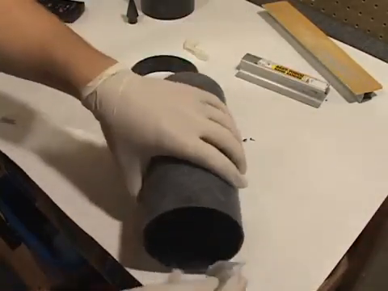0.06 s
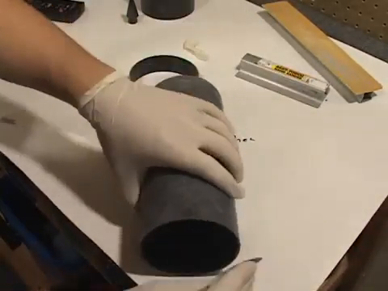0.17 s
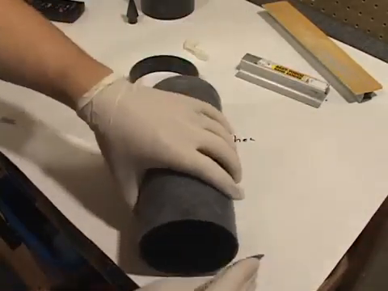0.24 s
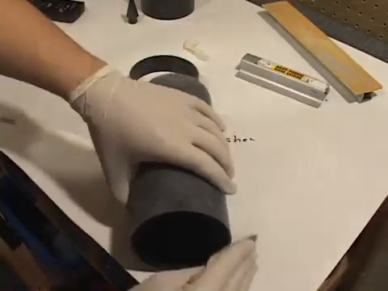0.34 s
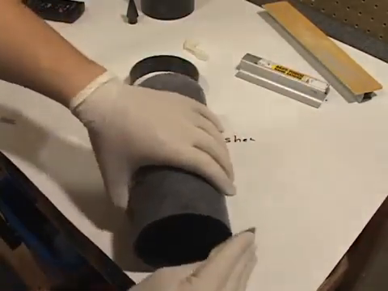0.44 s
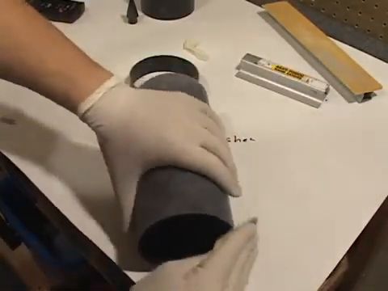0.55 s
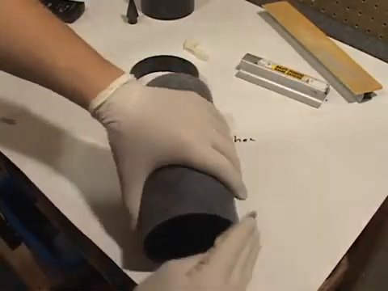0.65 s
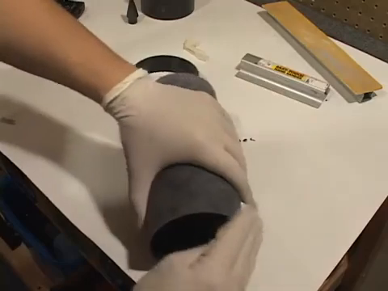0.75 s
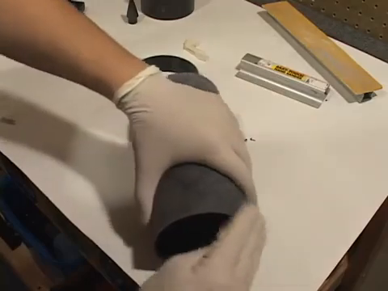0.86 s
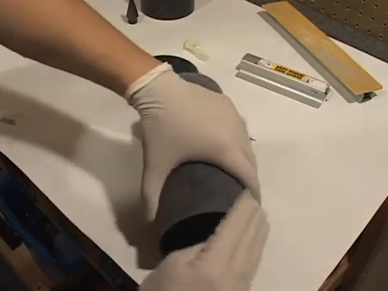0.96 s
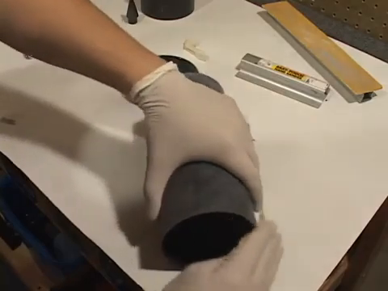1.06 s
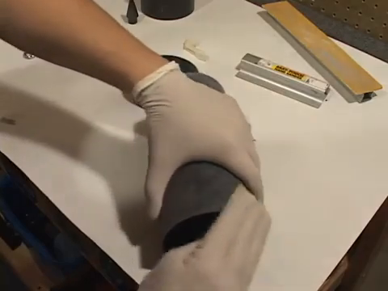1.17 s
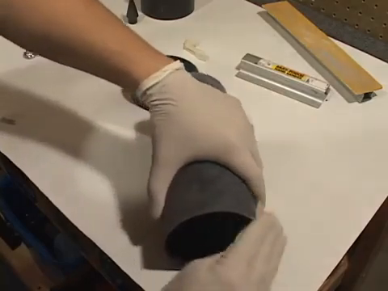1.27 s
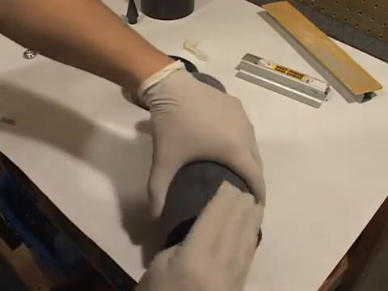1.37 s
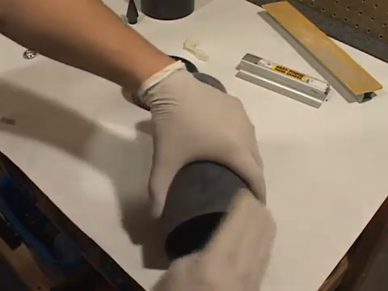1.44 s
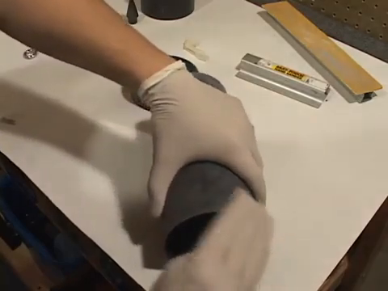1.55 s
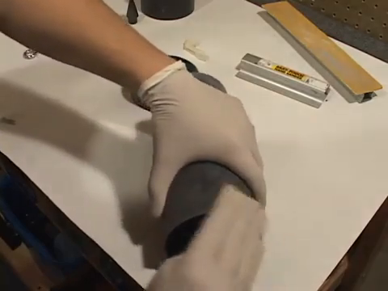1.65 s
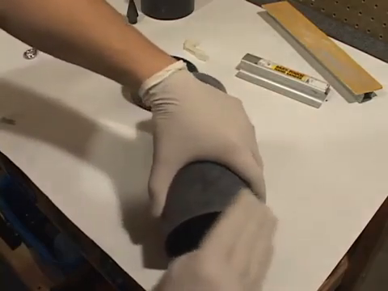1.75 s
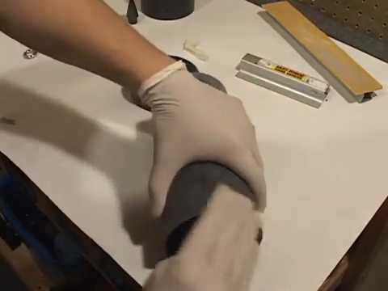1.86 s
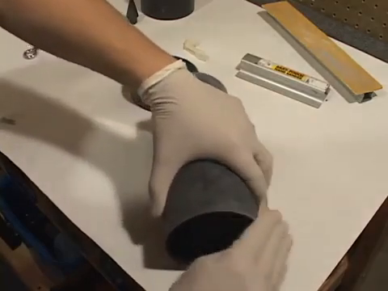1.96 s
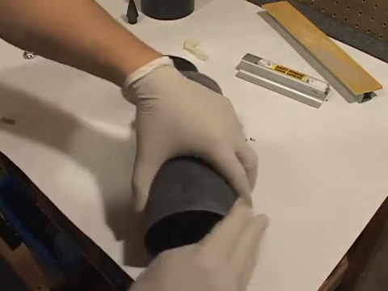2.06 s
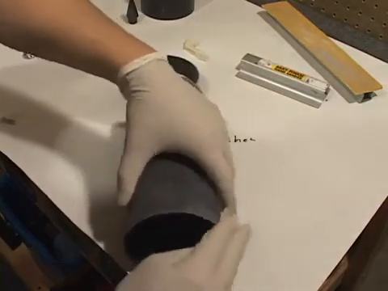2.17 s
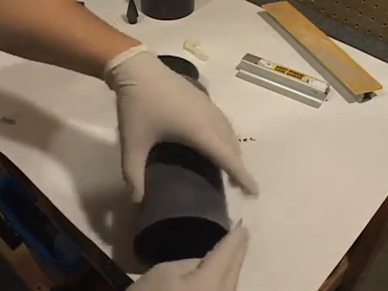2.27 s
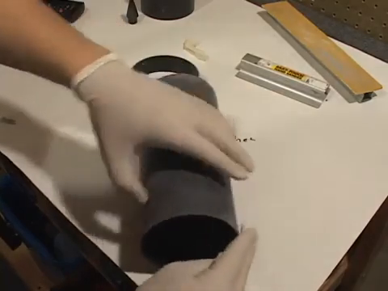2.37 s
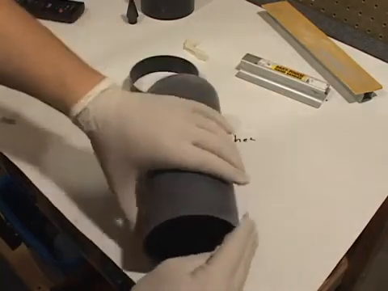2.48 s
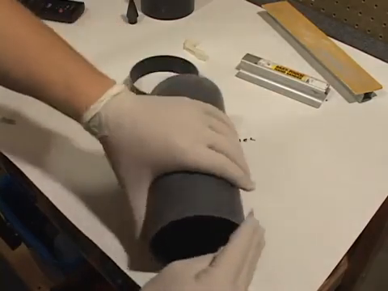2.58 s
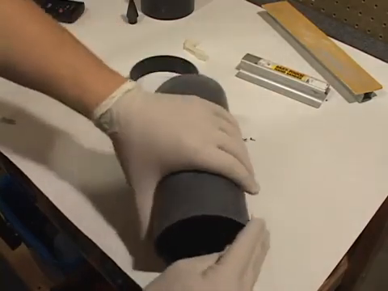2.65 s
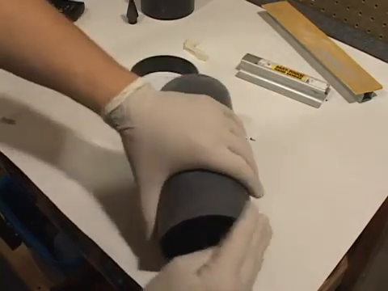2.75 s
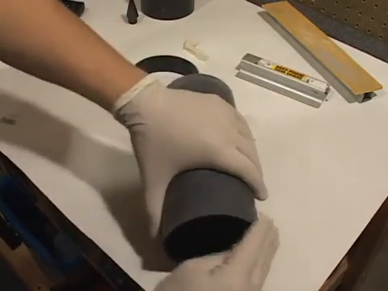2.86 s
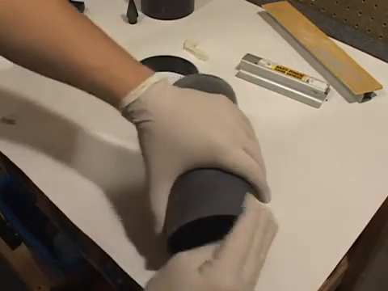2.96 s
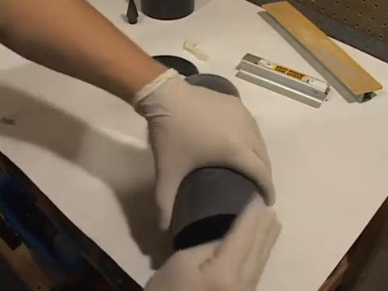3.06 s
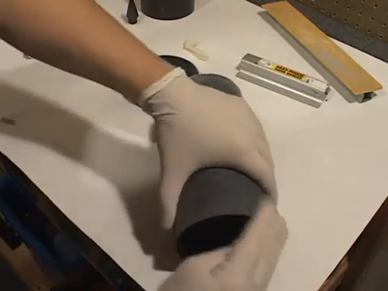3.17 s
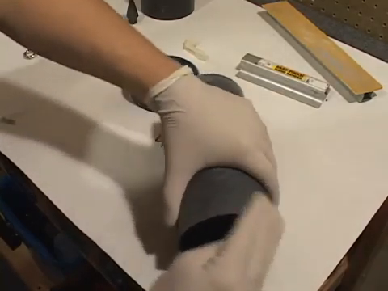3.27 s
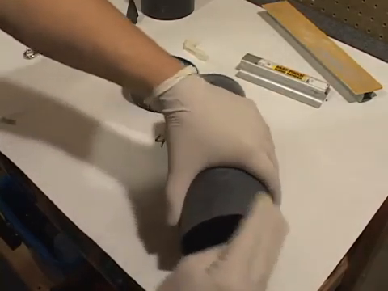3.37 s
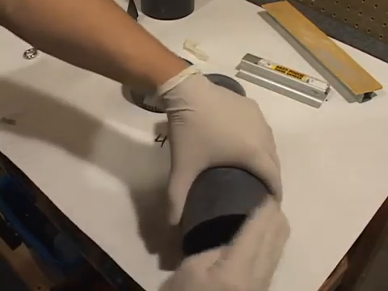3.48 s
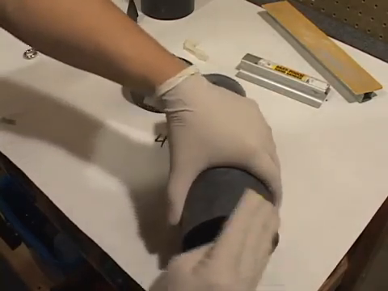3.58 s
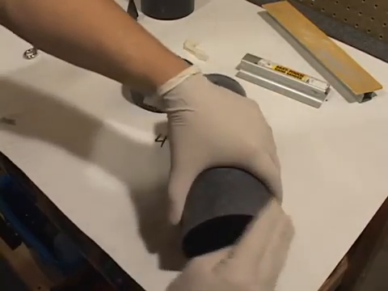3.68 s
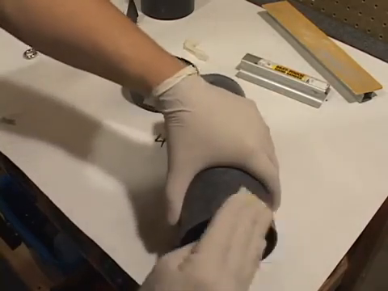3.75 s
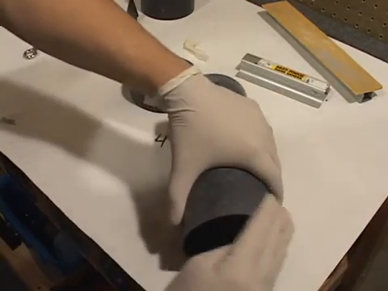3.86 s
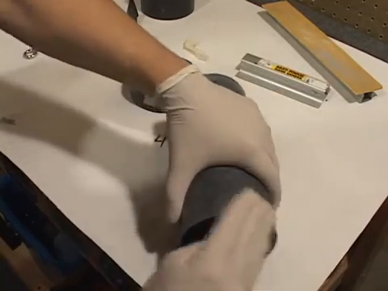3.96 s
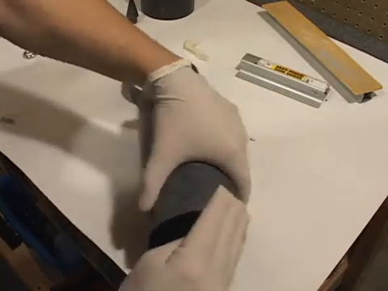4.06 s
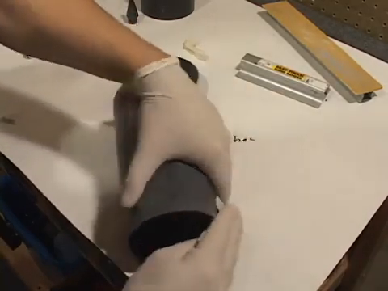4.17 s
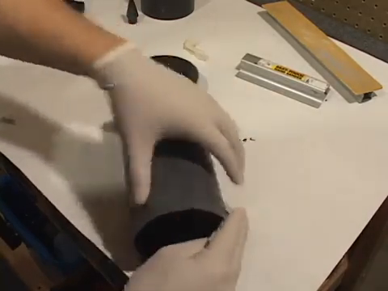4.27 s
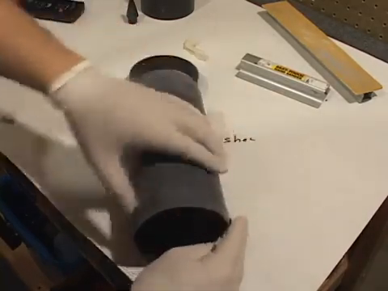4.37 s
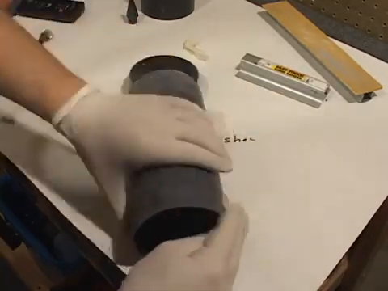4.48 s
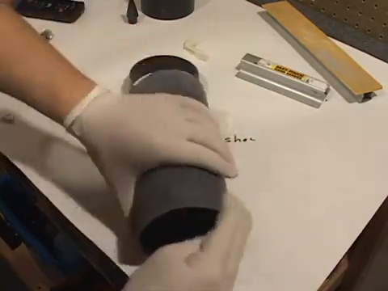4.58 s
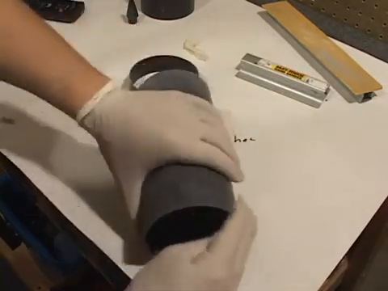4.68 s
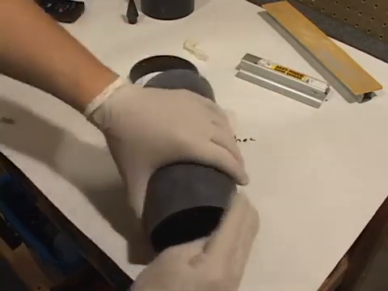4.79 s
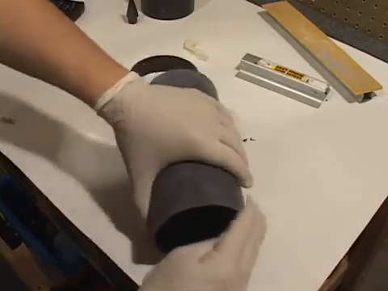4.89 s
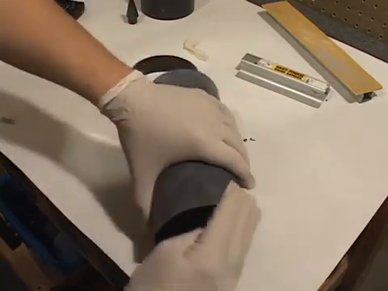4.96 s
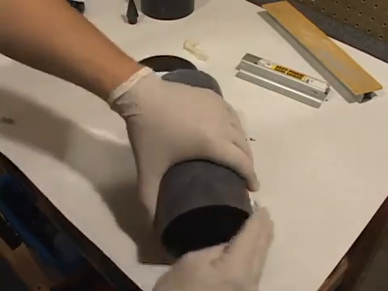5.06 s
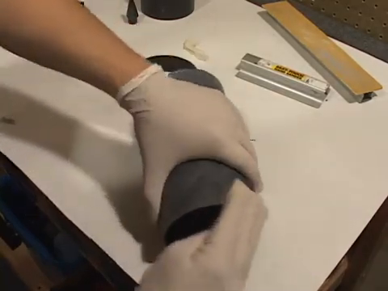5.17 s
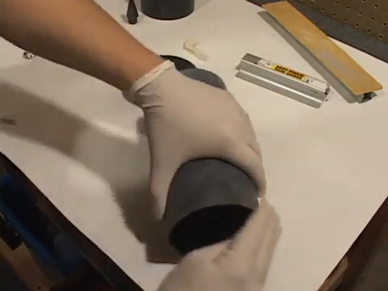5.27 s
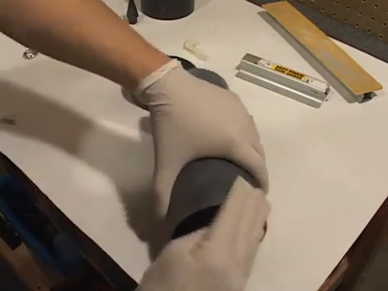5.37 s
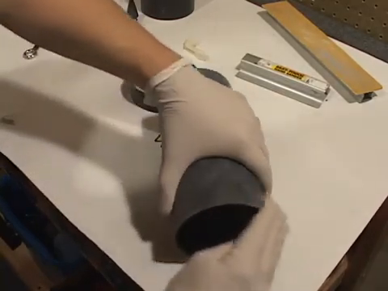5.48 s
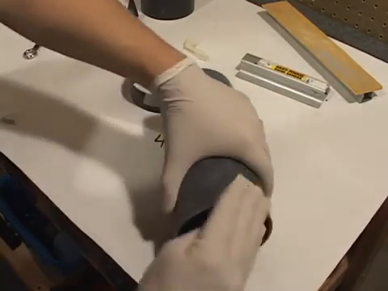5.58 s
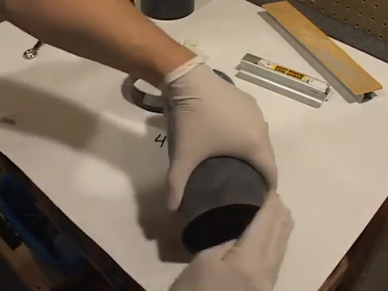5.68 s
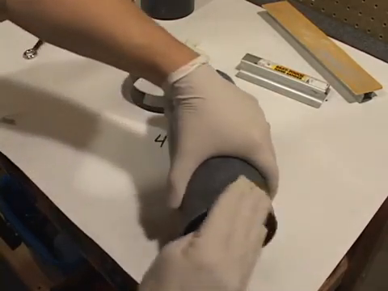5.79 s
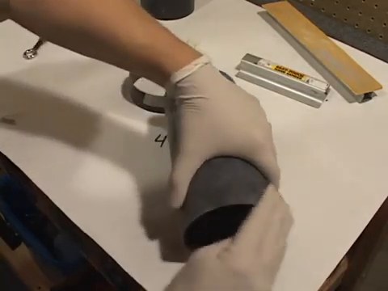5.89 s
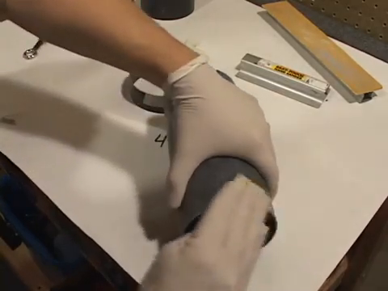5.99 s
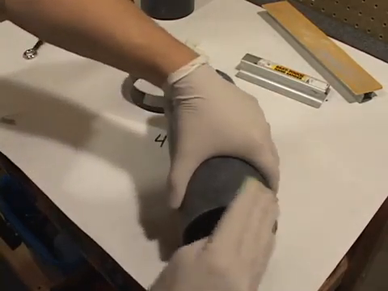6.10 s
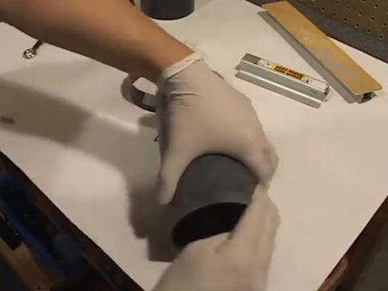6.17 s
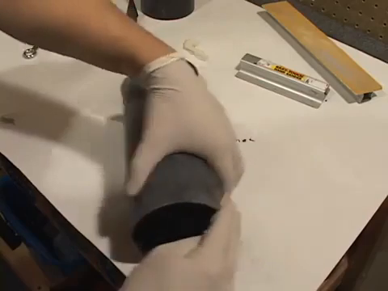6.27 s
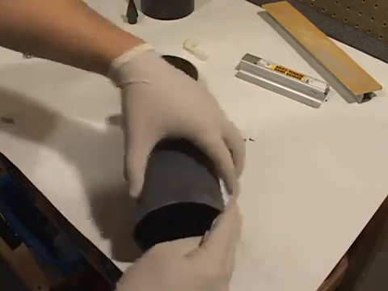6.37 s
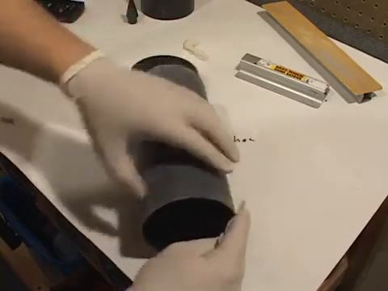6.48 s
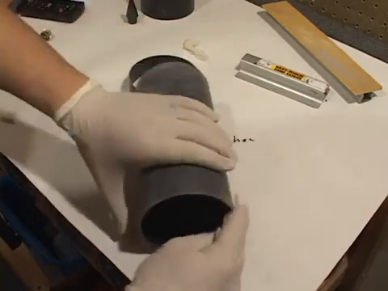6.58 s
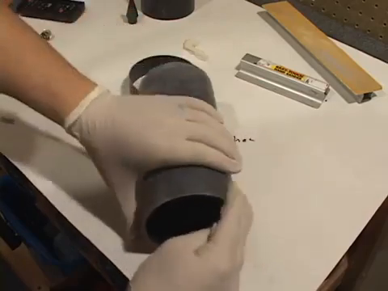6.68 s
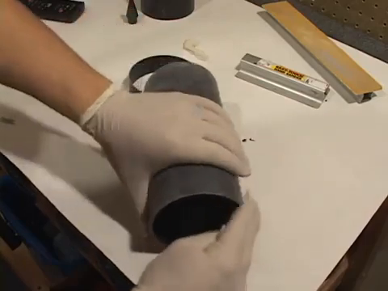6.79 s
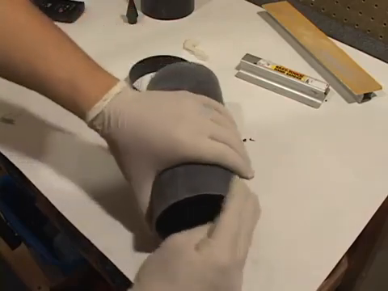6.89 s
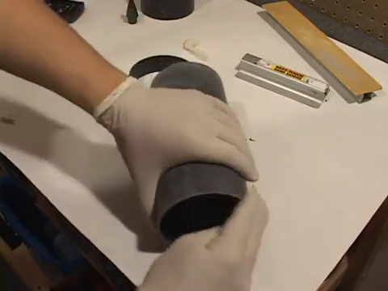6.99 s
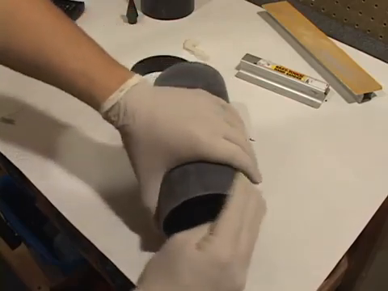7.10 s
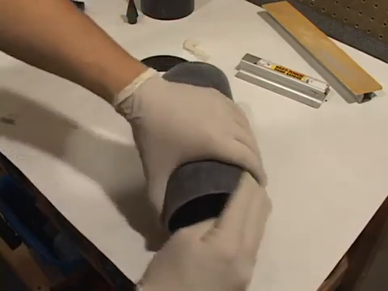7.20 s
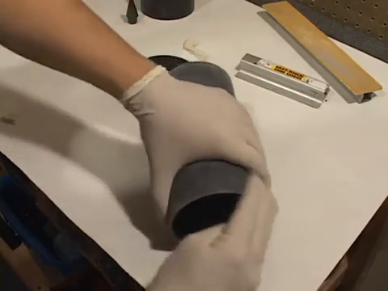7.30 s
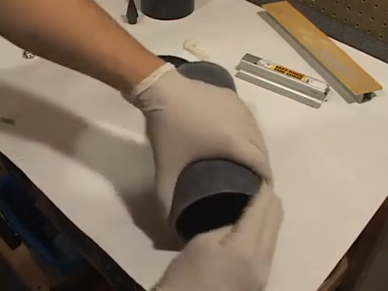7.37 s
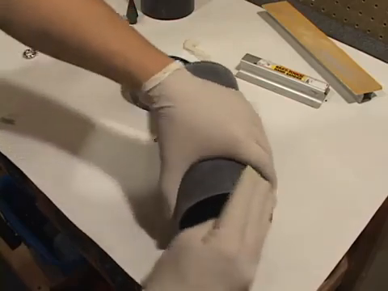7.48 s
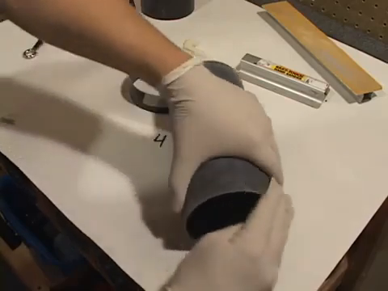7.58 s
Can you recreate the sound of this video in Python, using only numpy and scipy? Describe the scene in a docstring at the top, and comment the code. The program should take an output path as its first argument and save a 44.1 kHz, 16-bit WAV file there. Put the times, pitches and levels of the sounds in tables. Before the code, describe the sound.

A close stereo microphone in a small, fairly dry workshop hears sandpaper worked by hand inside a fiberglass tube. From 0 to 0.6 s there are light scrapes, low shuffles on the bench and small glove ticks, the sharpest near 0.2 s. Rapid back-and-forth strokes begin at 0.6 s, about ten a second, bright and gritty with tiny dips at each turn, growing stronger until 2.0 s. The tube is turned with a soft scrape and a thin squeak near 2.2 s, then a firm, hollow slap lands at 2.47 s. Sanding continues to 4.05 s; a stronger scrape follows, then a duller, quieter slap at 4.46 s. Another steady run lasts to 6.2 s, followed by a brighter scrape, a crisp tick and a hard ringing slap at 6.59 s. Strokes resume to the end around 7.6 s. Soft tube bumps, hollow humming, low rumble and faint room noise lie underneath.

```python
"""Sanding inside a fiberglass tube

Sandpaper scuffs back and forth inside the rim of a fiberglass tube on a workbench, heard close up.
Between runs of strokes the tube is turned, scraping on the bench, and the gloved hand slaps down on it again.
Rubbing is grainy noise shaped by the paper, wall and air column; slaps are fading tones with a crack and
a push of air, and light ticks are mostly crack. A small workshop answers; a faint room noise lies underneath."""
import sys
import numpy as np
from scipy import signal
from scipy.fft import rfft, irfft, next_fast_len
from scipy.io import wavfile
from scipy.ndimage import uniform_filter1d, map_coordinates

SR = 44100
rng = np.random.default_rng(int(sys.argv[2]) if len(sys.argv) > 2 else 0)


def store_wav(level_fs):
    """Save 16-bit WAV to argv[1]."""
    pcm = np.round(np.clip(np.atleast_2d(level_fs), -1, 1) * 32767)
    wavfile.write(sys.argv[1], SR, pcm.T.astype(np.int16))


N = 336919

# firm hand slaps, and two light ticks (0.592, 6.472) that are mostly crack:
# t/s, ring level/dB, softness above 2.2 kHz/(dB per octave), share of free ring time,
# then three levels relative to the ring: crack/dB, air push/dB, bore ring/dB
SLAPS = [(0.592, -43.5, -22, 1, 23, -36, -33), (2.4711, -5, -6.5, 0.42, -5, -13.5, -38),
         (4.456, -11.5, 22, 0.44, -6, -56, -34), (6.472, -39, -9, 0.22, 31.5, -36, -25),
         (6.5851, -4, -6, 0.42, -3, -17.5, -31.5)]
# low sounds of the work: t/s, bench rumble level/dB, level of the air inside the tube/dB (before it follows strokes)
LOWS = [(0.0, -72, -72), (0.25, -62, -48), (0.83, -56.5, -43.5), (1.34, -50.5, -38.5), (2.2, -64, -46),
        (2.49, -64, -50), (3.06, -51.5, -43.5), (4.2, -60, -46), (4.81, -53.5, -46), (5.85, -54, -43.5),
        (6.35, -60, -46), (6.79, -56, -49.5), (7.64, -59, -45)]


def amp(db):
    """Turn decibels into a plain factor."""
    return 10 ** (np.asarray(db) / 20)


def unit(x):
    """Scale a sound to rms 1."""
    return x / np.sqrt(np.mean(x ** 2) + 1e-20)


def along(points, hz):
    """Read a curve of (Hz, value) points on a log frequency axis."""
    f, v = np.transpose(points)
    return np.interp(np.log(hz + 1), np.log(f + 1), v)


def curves(rows, outside=None):
    """Give one value per sample for each column after the time."""
    s, *columns = np.transpose(rows)
    t = np.arange(N) / SR
    return [np.interp(t, s, column, outside, outside) for column in columns]


def wobble(rate):
    """A smooth random curve with rate knots a second."""
    knots = rng.standard_normal(int(N * rate / SR) + 4)
    return map_coordinates(knots, [np.arange(N) * rate / SR])


def filtered(x, response):
    """Multiply the spectrum of x by a complex response of frequency."""
    m = next_fast_len(N + SR // 2)
    return irfft(rfft(x, m) * response(np.fft.rfftfreq(m, 1 / SR)), m)[..., :N]


def coloured(x, spectrum):
    """Shape x by a (Hz, dB) spectrum, at rms 1."""
    return unit(filtered(x, lambda hz: amp(along(spectrum, hz))))


def above(x, edge_hz, order):
    """Keep the part of x above edge_hz, without shifting it in time."""
    return filtered(x, lambda hz: 1 / (1 + (edge_hz / (hz + 1)) ** order))


def resonant(x, modes):
    """Pass x through (Hz, width, dB) resonances over a weak broad response, at rms 1."""
    def response(f):
        peaks = 0
        for k, (hz, width, db) in enumerate(modes):
            peak = 1j * f * width / (hz * hz - f * f + 1j * f * width)
            peaks = peaks + (-1) ** k * amp(db) * peak  # neighbours alternate in sign
        lowest, highest = modes[0][0], modes[-1][0]
        broad = 0.27 / (1 + (lowest / (f + 1)) ** 4) / (1 + (f / highest / 3.84) ** 6)
        return peaks + broad
    return unit(filtered(x, response))


def grit(spiky_db, patchy_db):
    """Stereo friction noise: grains catch in short bursts, patches of pitch come and go, bands last about a stroke."""
    # how alike left and right are: f/Hz, correlation
    alike = [(30, 0.67), (200, 0.83), (700, 0.82), (1300, 0.8), (2400, 0.17), (4400, 0.14), (15000, 0.25)]
    grains = rng.standard_normal((2, N)) * amp(spiky_db * wobble(900))
    z = signal.stft(grains, nperseg=256)[2]

    def smooth_field(bins, frames):
        field = uniform_filter1d(rng.standard_normal(z.shape[1:]), size=bins, axis=0)
        return unit(uniform_filter1d(field, size=frames, axis=1))

    patches, bands = smooth_field(5, 8), smooth_field(2, 26)
    pair = signal.istft(z * amp(patchy_db * (patches + 1.1 * bands)), nperseg=256)[1][:, :N]

    def shares(hz):
        angle = np.arccos(np.clip(along(alike, hz), -1, 1)) / 2
        return np.array([np.cos(angle), np.sin(angle)])

    mid, side = filtered(pair, shares)
    return np.array([mid + side, mid - side])


def room_air():
    """Faint steady room noise: gently patchy noise with a fixed spectrum."""
    # room noise: f/Hz, density/(dB per Hz)
    spectrum = [(12, -29), (20, 15), (352, -7), (416, -9), (478, -5), (649, -28), (881, -2), (2920, 0),
                (13900, -18), (15500, -12)]
    return amp(-55) * coloured(grit(spiky_db=0, patchy_db=.8), spectrum)


def shop(x):
    """The workshop's answer: each frequency dies at its own speed, and the bass is weak."""
    # dying time of the room: f/Hz, time to fall 60 dB/s
    decay_times = [(200, 0.47), (2000, 0.22), (10000, 0.03)]
    hz, t, z = signal.stft(rng.standard_normal((2, SR // 2)), SR, nperseg=256)
    fading = z * amp(-60 * t / along(decay_times, hz)[:, None])
    tail = signal.istft(fading, SR, nperseg=256)[1]
    delayed = np.pad(x, ((0, 0), (150, 0)))  # 150 samples late
    wet = signal.fftconvolve(delayed, tail / np.linalg.norm(tail[0]), axes=1)[:, :N]
    return filtered(wet, lambda f: (1j * f / (700 + 1j * f)) ** 2)


def bench():
    """Lumpy low noise of hands and tube working on the bench, with a few heavier drags."""
    # forearm and tube drag on the bench: t/s, length/s, level/dB
    shuffles = [(.165, .11, -46), (.45, .11, -42)]
    # steady bench rumble: f/Hz, density/(dB per Hz)
    handling = [(15, -30), (30, -12), (60, -8), (150, 0), (213, -5), (400, -30)]
    # heavier drags: f/Hz, density/(dB per Hz)
    drag_spectrum = [(15, -24), (50, 9), (100, -6), (250, -9.5), (500, -33)]
    t = np.arange(N) / SR
    drags = np.zeros(N)
    for s, length, db in shuffles:
        start = 1 + np.tanh((t - s) / 0.0051)
        stop = 1 + np.tanh((s + length - t) / .03)
        drags += amp(db) * start * stop / 4
    noise = grit(spiky_db=1.5, patchy_db=1.2)
    rumble_db = curves(LOWS)[0] + 1.8 * wobble(6)
    return amp(rumble_db) * coloured(noise, handling) + drags * coloured(noise, drag_spectrum)


def ticks():
    """Small ticks of glove and paper: short bright snaps of noise that die quickly."""
    # ticks: t/s, peak level before the highest treble is softened/dB
    tick_rows = [(0.19, -16), (0.2178, -5), (0.4094, -29), (0.5566, -34), (2.2867, -19), (2.3594, -34),
                 (4.3364, -27), (6.4638, -13)]
    out, t = np.zeros(N + SR), np.arange(SR // 20) / SR
    for s, db in tick_rows:
        bright = np.diff(rng.standard_normal(len(t) + 1))
        snap = bright * amp(-60 * t / 0.025)  # falls 60 dB in 25 ms
        out[round(s * SR):][:len(t)] += amp(db) * snap / abs(snap).max()
    return filtered(out[:N], lambda hz: 1 / (1 + (hz / 6500) ** 4))


def squeaks():
    """Glove squeaks and the free tube singing: thin, slightly unsteady tones near 1 kHz."""
    # one list of points per squeak: t/s, f/Hz, level/dB (pitch and level then waver around these)
    squeak_paths = [
        [(2.15, 1130, -46), (2.2, 1200, -30), (2.225, 1150, -31), (2.27, 1030, -46)],
        [(2.3, 1010, -50), (2.32, 1015, -43), (2.385, 1015, -48), (2.45, 1015, -58)],
    ]
    out = np.zeros(N)
    for rows in squeak_paths:
        hz = curves(rows)[0]
        level_db = curves(rows, outside=-120)[1]
        phase = 2 * np.pi * np.cumsum(hz * (1 + 0.0035 * wobble(83))) / SR
        out += amp(level_db + 3.8 * wobble(40)) * np.sin(phase)
    return out


def bumps():
    """The tube bumps the bench: a short soft hum with a blurred pitch, and a brief shove."""
    # bumps: t/s, level/dB, f/Hz
    bump_rows = [(0.719, -32, 606), (1.121, -27.5, 601), (1.189, -25, 574), (2.644, -38, 584),
                 (2.842, -31, 582), (2.914, -25.5, 660), (3.625, -32.5, 730), (4.679, -29, 570),
                 (4.874, -27.5, 580), (5.877, -36, 690), (6.785, -26, 496)]
    out, t = np.zeros(N + SR), np.arange(SR // 2) / SR
    for s, db, hz in bump_rows:
        shove = (t / .0012) * np.exp(1 - t / .0012) - .25 * (t / .005) * np.exp(1 - t / .005)
        drift = np.cumsum(rng.standard_normal(len(t))) * 0.17
        swing = np.sin(2 * np.pi * hz * t + drift)
        hum = amp(-60 * t / 0.14) * (1 - np.exp(-t / 0.00027)) * swing
        out[round(s * SR):][:len(t)] += amp(db) * (hum - 0.34 * shove)
    return out[:N]


def slaps():
    """Firm slaps ring the tube's modes, crack, push air and stir the air column; light ticks mostly crack."""
    # modes of the struck tube: f/Hz, level/dB, time to fall 60 dB when free/s
    ring_modes = [(515, -11.5, 0.075), (730, -5.5, 0.067), (997, -4, 0.11), (1100, -6, 0.23),
                  (1860, -11, 0.07), (2002, 0, 0.29), (2058, -3.5, 0.12), (2245, -11, 0.2),
                  (2587, -3.5, 0.11), (2950, -3, 0.046), (1680, -8, 0.081), (3520, -8, 0.088),
                  (4560, -12.5, 0.15), (4810, -13, 0.055)]
    hits, push, t = np.zeros(N + SR), np.zeros(N + SR), np.arange(SR // 2) / SR
    clack = signal.butter(1, [1500, 4500], "band", fs=SR, output="sos")
    no_bass = signal.butter(1, 300, "high", fs=SR, output="sos")  # keeps the ring and crack free of a low thump
    for s, db, soft_db, free, crack_db, push_db, bore_db in SLAPS:
        ring = np.zeros(len(t))
        for hz, level_db, t60 in ring_modes:
            drift = np.cumsum(rng.standard_normal(len(t))) * .07  # the hand on the wall blurs each mode
            dull_db = soft_db * max(np.log2(hz / 2200), 0)
            mode_db = level_db - dull_db + rng.normal(0, 0.42) - 60 * t / t60 / free
            ring += amp(mode_db) * np.sin(2 * np.pi * hz * t + drift)
        ring *= 0.45 + amp(-60 * t / 0.014)  # the glove damps the first swings quickly
        ring *= 1 - np.exp(-t / .0004)  # soft contact
        snap = signal.sosfilt(clack, rng.standard_normal(len(t)))
        crack = amp(crack_db - 60 * t / 0.044 / free) * snap
        hits[round(s * SR):][:len(t)] -= amp(db) * signal.sosfilt(no_bass, ring + crack)

        dent = 1.9 * (1 - np.exp(-t / .0002)) * (np.exp(-t / .001) + .5 * np.exp(-t / .007))
        sway = .45 * amp(-60 * t / .42) * np.sin(2 * np.pi * 5.3 * t)
        build_up = (t / 0.03) ** 2 * np.exp(2 - 2 * t / 0.033)  # the air column builds up after the blow
        bore = build_up * np.sin(2 * np.pi * 365 * t)
        air = amp(db + push_db) * (sway - dent) + amp(db + bore_db) * bore
        push[round(s * SR):][:len(t)] += air
    return hits[:N], push[:N]


def scraping():
    """Broad, dull scrapes of tube on bench and paper on rim: a quick rise, a hold, a slower fall."""
    # tube and paper moved about: time of full level/s, hold/s, level/dB, swell over the hold/dB,
    # treble over body/dB, lower edge f/Hz
    scrape_rows = [(0, 0.0085, -44.5, 6.5, -4.5, 450), (0.166, 0.037, -35, 7, -0.5, 345),
                   (0.329, 0.055, -31.5, -3.5, -2.5, 446), (0.433, 0.014, -29, 6.5, -2.5, 446),
                   (0.505, 0.057, -55, 16, 6.5, 446), (2.045, 0.2, -31, 4, 1, 590),
                   (2.278, 0.034, -36, 3.5, -0.5, 540), (2.357, 0.13, -45, 13, -1, 550),
                   (4.033, 0.18, -20.5, 0.5, -2.5, 920), (4.306, .14, -42.5, 10, 3, 740),
                   (6.22, .11, -20, 6, -1.5, 1390), (6.377, 0.041, -48, -1, 0, 1140),
                   (6.463, 0.17, -37, 7, 4, 1110)]
    # scrape noise: f/Hz, density/(dB per Hz)
    spectrum = [(120, -71), (200, -40), (273, -19), (339, -10), (641, -8.5), (715, -10.5), (1910, -6.5),
                (2750, -8), (8670, -19.5), (15500, -37)]
    rise_db_per_s, fall_db_per_s, arch_db = 900, 342, 2
    out = np.zeros((2, N))
    scuff = coloured(grit(spiky_db=1.5, patchy_db=1.66), spectrum)
    treble, top = above(scuff, 4000, 8), above(scuff, 9000, 6)
    for s, hold, db, swell_db, fizz_db, low_hz in scrape_rows:
        span = slice(max(round((s - .1) * SR), 0), round((s + hold + .15) * SR))
        t = np.arange(N)[span] / SR - s
        through = np.clip(t / hold, 0, 1) - .5
        rise_db = rise_db_per_s * np.minimum(t, 0)
        fade_db = -fall_db_per_s * np.maximum(t - hold, 0)
        held_db = db + swell_db * through + arch_db * (1 - 8 * through ** 2)
        level_db = held_db + rise_db + fade_db
        treble_db = fizz_db - .3 * np.maximum(fade_db, -25)  # treble lingers as a scrape fades
        low_cut = signal.butter(2, low_hz, "high", fs=SR, output="sos")
        body = signal.sosfilt(low_cut, (scuff - treble)[:, span])
        slow = np.clip((-7.0 - level_db) / 40, 0, .55)  # gentle scrapes lose the highest fizz
        fizz = unit(treble[:, span] - slow * top[:, span])
        out[:, span] += amp(level_db) * (unit(body) + amp(treble_db) * fizz)
    return out


def loose_rim(rasp):
    """The rim's high mode sings under the paper, louder while the hand lets go and takes hold again."""
    # rim mode: f/Hz, width/Hz
    hz, width = (4530, 116)
    loose_db, held_db = -7.5, -18
    before_s, after_s = 0.067, 0.12  # the hold is loose this long around each firm slap
    t = np.arange(N) / SR
    loose = np.zeros(N)
    for s, db, *_ in SLAPS:
        if db > -25:  # firm slaps only
            let_go = 1 + np.tanh((t - s + before_s) / .02)
            take_hold = 1 + np.tanh((s + after_s - t) / 0.052)
            loose += let_go * take_hold / 4
    singing = unit(filtered(rasp, lambda f: 1j * f * width / (hz * hz - f * f + 1j * f * width)))
    return amp(held_db + (loose_db - held_db) * loose) * singing


def stroke_curves():
    """The paper stops at each turn and breaks loose suddenly; gives level, brightness and wall hum in dB."""
    # strokes, pushes that fade and pulls that swell: t/s, length/s, level/dB, swell from start to end/dB
    strokes = [(0.621, 0.036, -23, -1.0), (0.687, 0.051, -25, -3.5), (0.768, 0.086, -22, -4.5),
               (0.876, 0.08, -23.0, -1.5), (0.972, 0.087, -21.5, 1.5), (1.065, 0.082, -24, -1.5),
               (1.156, 0.09, -21.5, 8), (1.256, 0.08, -22.5, -0.5), (1.36, 0.079, -20.5, 7),
               (1.466, 0.079, -21.0, -2.5), (1.57, 0.075, -19, 5.5), (1.676, 0.075, -20, -2.0),
               (1.787, 0.071, -19, 0), (1.892, 0.11, -21, -2.5), (2.406, 0.059, -33, 14),
               (2.494, 0.097, -23.5, -5), (2.621, 0.048, -25.5, -0.5), (2.69, 0.084, -23.5, -1),
               (2.795, 0.083, -24.5, -7), (2.879, 0.095, -22.5, 3.5), (2.994, 0.074, -23, -5),
               (3.086, 0.09, -23, 4.5), (3.195, 0.074, -22.5, -1), (3.297, 0.088, -22.5, 7.5),
               (3.403, 0.089, -23.5, -9), (3.508, 0.084, -22.0, 9.5), (3.615, 0.093, -22, -2),
               (3.728, 0.086, -22, 4.5), (3.843, 0.086, -21.5, -1), (3.955, 0.1, -21, -0.5),
               (4.372, 0.1, -31.0, 8.0), (4.492, 0.1, -22, 3), (4.619, 0.077, -22.5, -3),
               (4.71, 0.09, -21.0, 2), (4.82, 0.08, -22.0, -4), (4.909, 0.094, -20.5, 8),
               (5.028, 0.077, -21.5, -2.5), (5.127, 0.083, -20.5, 3.5), (5.235, 0.085, -22.0, -3.5),
               (5.337, 0.09, -21, 4.5), (5.444, 0.081, -22.5, -3.5), (5.549, 0.089, -20, 2),
               (5.662, 0.074, -20, -5), (5.767, 0.081, -21, 5), (5.875, 0.085, -20.0, -8.5),
               (5.983, 0.08, -20.5, 2.5), (6.101, 0.12, -21.5, -4.5), (6.522, 0.067, -28, 8),
               (6.622, 0.097, -21.0, -2.0), (6.727, 0.077, -24.5, 2), (6.82, 0.097, -22, 4),
               (6.927, 0.077, -23.5, 2), (7.026, 0.081, -21.0, 2.5), (7.132, 0.076, -22.5, -3.5),
               (7.233, 0.08, -21.0, 2.5), (7.341, 0.074, -20.5, -1.5), (7.44, 0.073, -20.0, 2.0),
               (7.556, 0.065, -20.5, -4)]
    break_s, halt_s = 0.0044, 0.0087  # the paper breaks loose faster than it stops
    level_db, bright_db, wall_db = np.full(N, -90.), np.zeros(N), np.zeros(N)
    starts, lengths, levels_db, swells_db = np.transpose(strokes)
    drops_db = 12 + 0.67 * np.clip(swells_db, -4, 4)  # the stop before a pull is the more complete
    turn_db, = curves(np.transpose([starts, levels_db - drops_db]))
    pauses = starts[1:] - (starts + lengths)[:-1]
    leads = np.minimum(np.r_[1, pauses] / 2, .03)  # back to the middle of the pause, 30 ms at most
    for (s, length, db, swell_db), lead in zip(strokes, leads):
        span = slice(round((s - lead) * SR), min(round((s + length + .03) * SR), N))
        t = np.arange(N)[span] / SR - s
        through = np.clip(t / length, 0, 1) - .5
        arch_db = 0.5 * (1 - 8 * through ** 2)  # mid-stroke is fastest and loudest
        pressed_db = db + swell_db * through + arch_db
        moving = (1 + np.tanh(t / break_s)) * (1 + np.tanh((length - t) / halt_s)) / 4
        level_db[span] = pressed_db + (1 - moving) * (turn_db[span] - pressed_db)
        # harder strokes and pulls rasp brighter; the turn is duller
        stroke_bright_db = 0.47 * max(db + 22, -8) + 0.17 * np.clip(swell_db, -4, 4)
        bright_db[span] = stroke_bright_db - 2.5 * (1 - moving)
        wall_db[span] = -10.5 + 4 * (1 - moving)  # against the rasp
    return uniform_filter1d([level_db, bright_db, wall_db], size=80, axis=1)


def sanding():
    """Paper grains rasp on the rim; the rasp dips and dulls at each turn, and wall and air column hum along."""
    # paper rasp: f/Hz, density/(dB per Hz)
    rasp_spectrum = [(1500, -24), (2800, -12.5), (3600, -4.5), (4100, 0.5), (4470, -2), (4900, 1),
                     (5800, -1.5), (7270, 1), (10500, -8), (13000, -17.5), (15500, -29)]
    # modes of the held tube wall: f/Hz, width/Hz, level/dB
    wall_modes = [(998, 224, -2.5), (1402, 137, 1), (1954, 242, -0.5), (2230, 84, 6), (2830, 590, -0.5)]
    # modes of the air column: f/Hz, width/Hz, level/dB
    bore_modes = [(257.4, 7.6, -3.5), (374, 15, -3.5), (502, 81, -6.5), (588.6, 24, 5.5), (688, 61, -5.5)]
    level_db, bright_db, wall_db = stroke_curves()
    level_db = level_db + 1.04 * wobble(60)

    rasp = coloured(grit(spiky_db=0.72, patchy_db=1.2), rasp_spectrum)
    treble = above(rasp, 6000, 8)
    body = rasp - treble
    rasp = amp(-.45 * bright_db) * body + amp(0.98 * (bright_db + 0.57)) * treble

    wall = resonant(grit(spiky_db=1.5, patchy_db=1.5), wall_modes)
    wall_level_db = level_db + wall_db + 1.44 * wobble(25)

    follow_db = 0.47 * (np.maximum(level_db, -39) + 23.0)  # the air follows the strokes about half
    bore_db = curves(LOWS)[1] + follow_db + 3.4 * wobble(22)
    bore = resonant(grit(spiky_db=2.5, patchy_db=-0.5), bore_modes)

    rubbed = amp(level_db) * (rasp + loose_rim(rasp))
    return rubbed + amp(wall_level_db) * wall + amp(bore_db) * bore


def scene():
    """Mix all sources; rubbing and blows also go to the workshop's answer."""
    hits, push = slaps()
    rubbing = sanding() + scraping() + squeaks() + ticks()
    struck = (hits + bumps()) * amp([[.3], [-.3]])  # slightly louder on the left
    answer = shop(amp(-12) * rubbing + amp(-5.5) * struck)
    return rubbing + bench() + struck + push + answer + room_air()


def record(dry):
    """Loud peaks flatten near full scale; the left hears the lows slightly later; the highest treble is cut."""
    top_hz = 15670
    held = dry / (1 + np.abs(dry / 1.05) ** 8) ** (1 / 8)

    def response(hz):
        delay_s = np.array([[4e-5], [0]]) / (1 + (hz / 3000) ** 2)  # left, right
        return np.exp(-2j * np.pi * hz * delay_s) * (hz < top_hz)

    return filtered(held, response)


dry = scene()
out = record(dry)
store_wav(out)
```